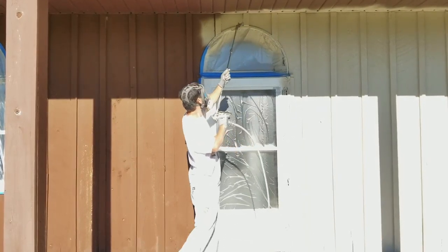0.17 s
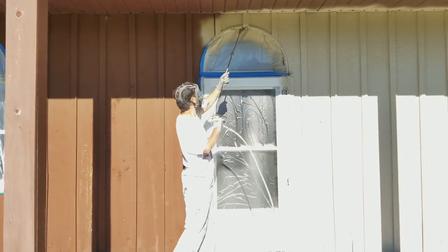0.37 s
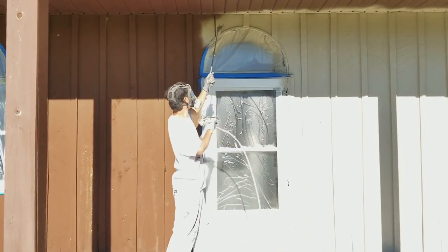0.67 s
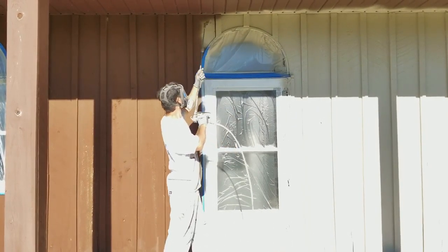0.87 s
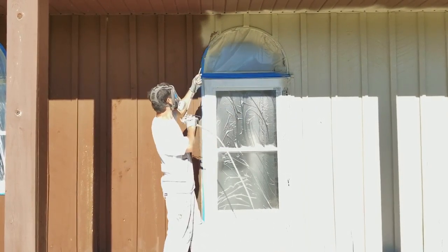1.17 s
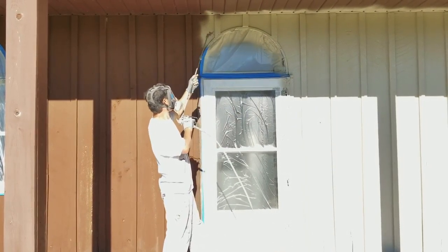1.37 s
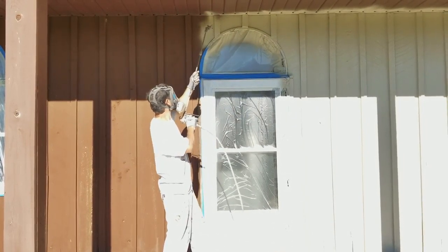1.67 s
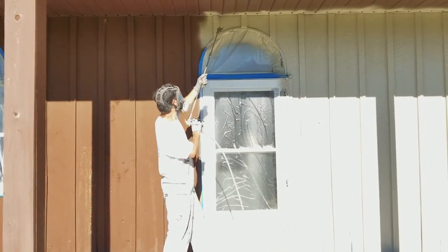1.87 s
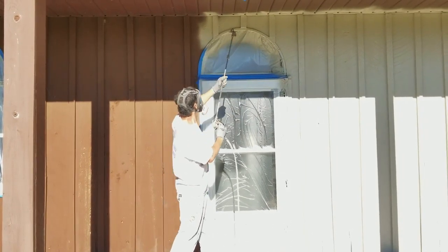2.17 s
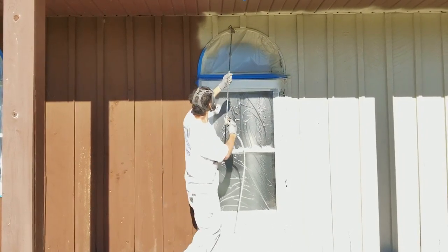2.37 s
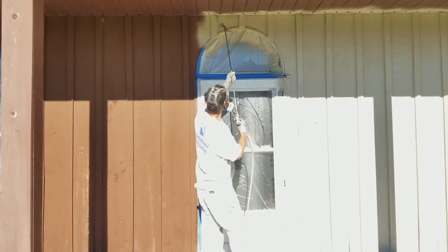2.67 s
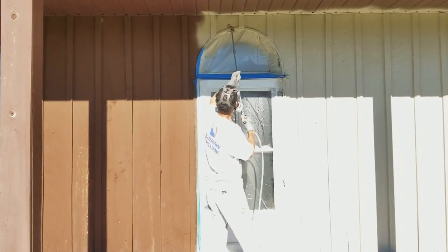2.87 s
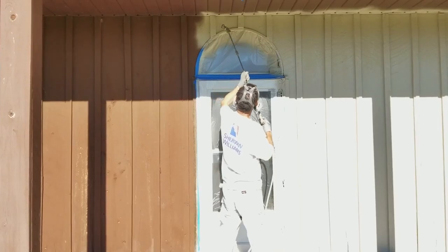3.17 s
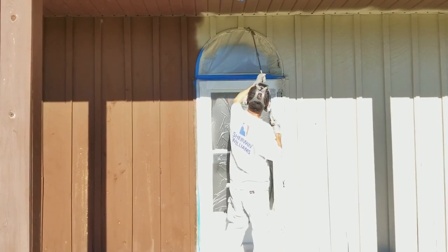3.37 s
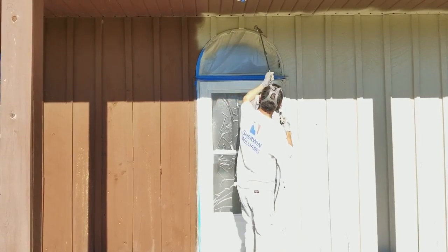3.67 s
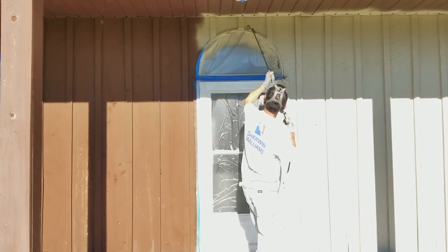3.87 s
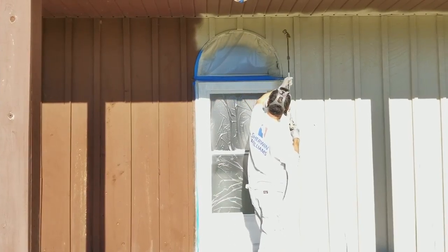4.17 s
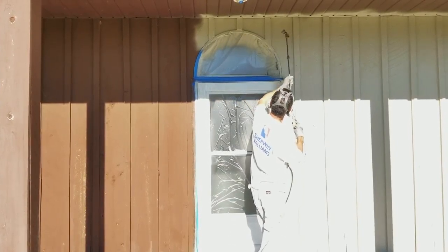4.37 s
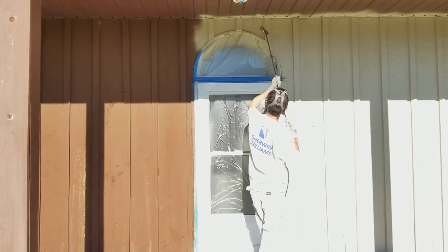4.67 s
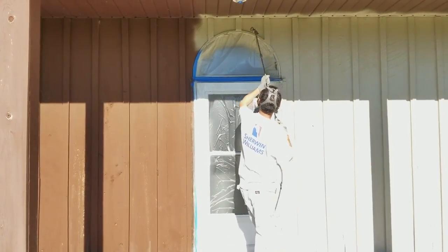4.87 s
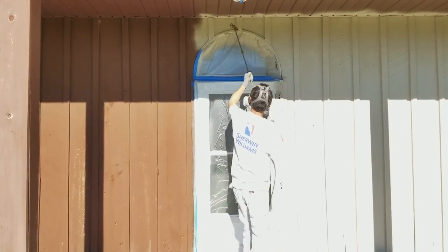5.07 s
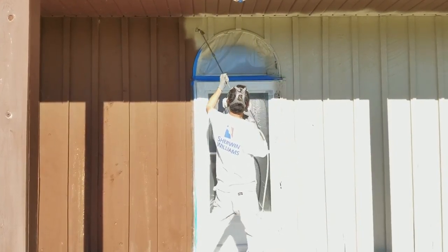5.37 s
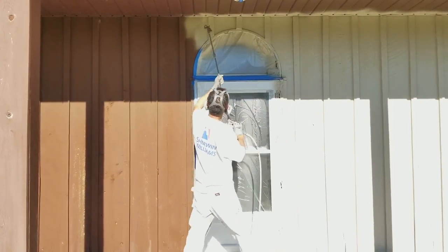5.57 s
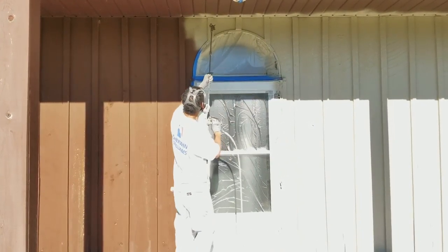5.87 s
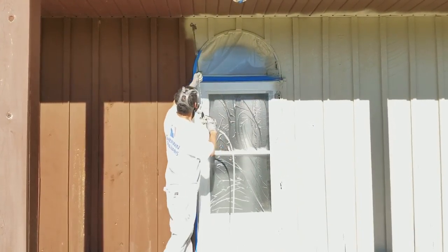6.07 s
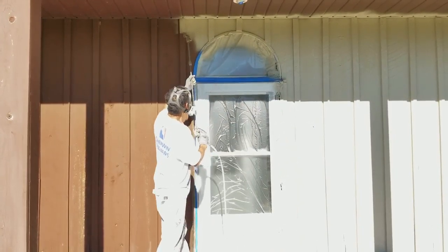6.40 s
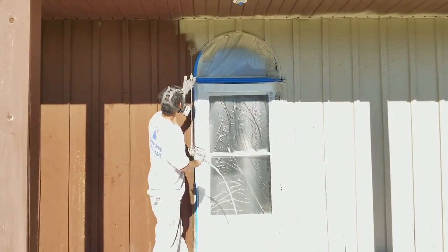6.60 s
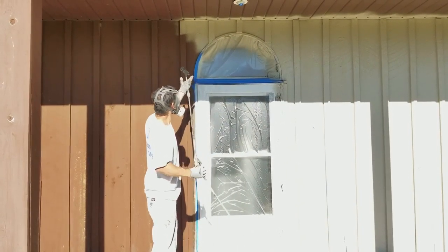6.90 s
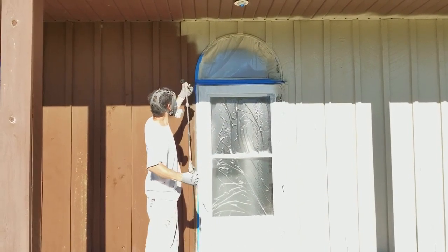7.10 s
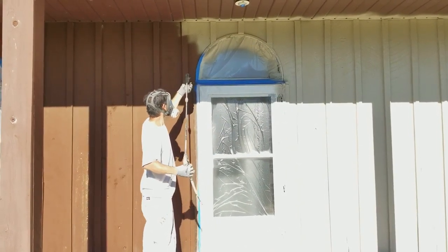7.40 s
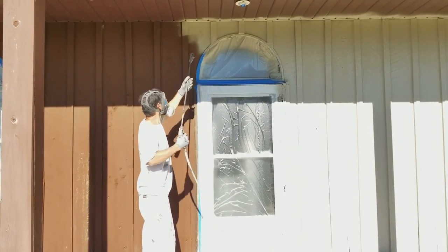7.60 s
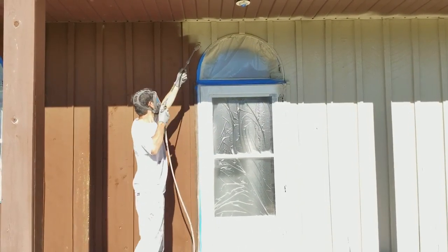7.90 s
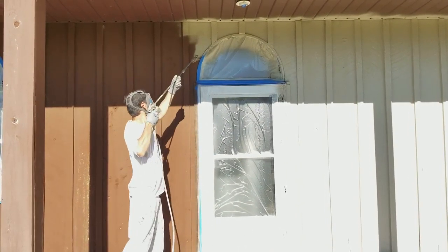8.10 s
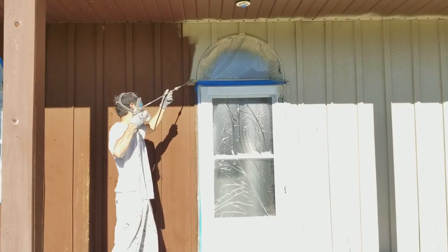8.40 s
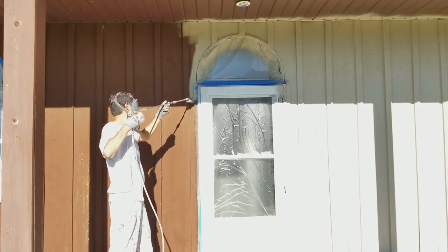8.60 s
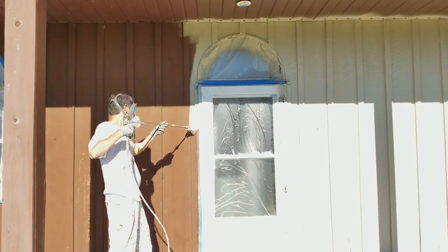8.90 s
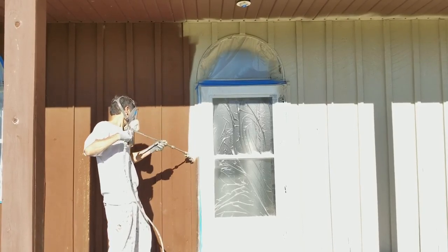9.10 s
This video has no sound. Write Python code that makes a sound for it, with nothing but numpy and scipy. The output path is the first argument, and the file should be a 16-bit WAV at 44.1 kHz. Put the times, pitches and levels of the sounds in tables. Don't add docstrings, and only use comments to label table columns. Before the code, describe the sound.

Stereo microphone near a painter under a timber overhang in a quiet yard. Crisp high-pressure hisses come and go, mostly a tenth of a second long, then two slightly longer sweeps. Soft rumble, light wind, clothing and hose rustles and faint chirps fill the gaps. A gritty electric pump whines for under a second on the left, a tap sounds, and continuous spray takes over to the end.

```python
import sys
import numpy as np
from scipy import signal
from scipy.fft import rfft, irfft, next_fast_len
from scipy.io import wavfile
from scipy.ndimage import uniform_filter1d

SR = 44100
rng = np.random.default_rng(int(sys.argv[2]) if len(sys.argv) > 2 else 0)


def store_wav(level_fs):
    pcm = np.round(np.clip(np.atleast_2d(level_fs), -1, 1) * 32767)
    wavfile.write(sys.argv[1], SR, pcm.T.astype(np.int16))


def gain_from_decibels(decibels):
    exponent = np.asarray(decibels, float) / 20
    return 10 ** exponent


N = 407925

# [time_s, level_db]
RUMBLE = [(0.0, -66), (0.05, -57), (0.98, -57), (1.03, -50), (1.29, -59), (1.75, -59), (1.83, -45.5),
          (1.93, -62), (1.98, -49.5), (2.16, -57), (2.26, -53.5), (3.06, -58.5), (4.53, -55.5),
          (4.97, -50.5), (5.49, -71.5), (5.98, -70.5), (6.7, -52.5), (7.2, -56), (7.8, -51.5), (8.2, -56.5),
          (9.25, -56)]
# [freq_hz, density_db]
RUMBLE_COLOUR = [(12, -45), (30, -20.5), (55, -9), (80, -1), (97, 3.5), (118, -3.5), (140, -6.5), (172, -7),
                 (200, -16), (300, -20), (430, -28), (520, -52)]
# [time_s, level_db]
GUSTS = [
    (0, -59),
    (1.7, -54),
    (2.6, -57),
    (3.2, -66),
    (4.1, -73.5),
    (4.7, -55),
    (5.4, -81),
    (6.6, -78.5),
    (9.25, -70),
]
# [freq_hz, density_db]
WIND_COLOUR = [(15, -2.5), (35, 4.0), (60, 2.0), (110, -7.5), (200, -42.5)]
# [peak_s, fade_s, level_db]
SWELLS = [(.2, 0.35, -63), (.8, 0.34, -69.5), (2.1, 0.19, -60.5), (2.35, 0.24, -69), (2.85, 0.35, -70),
          (3.24, 0.081, -65), (3.63, 0.15, -62), (4.1, 0.56, -71), (4.85, 0.066, -70), (5.48, 0.13, -63),
          (5.8, 0.14, -70), (7.48, 0.11, -64), (7.75, 0.25, -64)]
# [freq_hz, density_db]
HUM_COLOUR = [(130, -46.5), (230, -15), (437, -16.5), (530, -7), (640, -7.5), (710, 0), (780, -6.5),
              (860, -0.5), (950, -15), (1110, -17), (1400, -21.5), (1900, -59)]
# [pitch_hz, level_db]
HUM_TONES = [
    (527.6, -80),
    (710.6, -80),
    (855.9, -82),
]
# [freq_hz, density_db]
INSECT_COLOUR = [(600, -30), (1000, -11), (1250, -2.5), (1630, -22.5), (2300, -13.5), (3200, -23),
                 (3600, -6.5), (4100, -0.5), (4600, -20.5), (5500, -26.5), (7000, -48)]
# [peak_s, fade_s, rustle_db, scuff_db]
MOVES = [(0.02, 0.14, -65, -88), (0.2, 0.12, -62.5, -74), (.6, 0.2, -64.5, -76), (0.85, 0.17, -65, -78),
         (1.47, 0.057, -49.5, -72), (2.05, 0.094, -65, -67.5), (2.29, 0.066, -66, -76),
         (2.76, 0.065, -54, -81), (2.95, 0.2, -61.5, -72.5), (3.43, 0.14, -69.5, -86),
         (3.68, 0.086, -65, -81), (4.07, 0.081, -61, -70.5), (4.25, 0.32, -61, -81),
         (4.44, 0.089, -62, -78), (4.7, 0.27, -61.5, -94), (5.02, 0.16, -61, -78), (5.62, 0.16, -66, -74.5),
         (5.85, 0.063, -66, -78), (7.59, 0.092, -47.5, -54.5), (7.65, 0.046, -60, -54),
         (7.43, .04, -76, -71), (7.472, 0.04, -53.5, -53.5), (1.42, .04, -55, -75),
         (7.72, 0.061, -58, -65.5), (1.62, 0.14, -71, -76), (7.76, 0.092, -61.5, -82)]
# [peak_s, fade_s, rustle_db, scuff_db]
JERKS = [
    (1.387, 0.15, -55.5, -77),
    (7.522, 0.067, -51, -54),
]
# [freq_hz, density_db]
RUSTLE_COLOUR = [(2940, -21.5), (4400, -5.5), (5430, -15.5), (5890, -13.5), (6920, -11), (8000, -1.5),
                 (9430, -10), (13500, 0), (15100, -10.5), (15900, 3.5)]
SCUFF_COLOUR = [(700, -43), (1200, -9.5), (2100, -.5), (3500, -1), (5400, -6), (6200, -7), (7800, -20)]

# [open_s, shut_s, left_lag_samples, jet_db]
TRIGGER = [
    (0.219, 0.344, 1.63, -33),
    (1.049, 1.215, -1, -31.5),
    (1.707, 1.828, -1, -29.5),
    (2.465, 2.565, 0.5, -36),
    (2.991, 3.107, 0.5, -27.5),
    (3.738, 3.867, 0.85, -35.5),
    (4.451, 4.57, 2.5, -35.5),
    (5.047, 5.38, 0.5, -37),
    (5.872, 6.241, -1.4, -37),
    (8.004, 9.4, -1.8, -33),
]
NEEDLE_LIFT = [.005, .005, .005, .002, .005, .005, .003, .007, .013, .004]
# [freq_hz, density_db]
JET_COLOUR = [(150, -38.5), (260, -25.5), (420, -26.5), (600, -22), (1100, -13.5), (1400, -11.5),
              (2100, -15), (3200, -13.5), (4500, -6), (5600, -12), (6750, -4.5), (7500, 0.5), (8250, 4),
              (9100, 0), (10200, -0.5), (11800, 3), (13500, 3), (15700, -3.5)]
# [freq_hz, likeness]
JET_ALIKE = [(500, 1), (2400, 0.91), (5000, 0.69), (8000, 0.59), (12000, 0.63), (15000, 0.26)]
# [time_s, turned_db, near_db, gap_hz, ring_db]
WAND = [(0.28, 10, 6.5, 4600, -4), (1.13, 4, 1.2, 4800, 0), (1.76, 6, 0.3, 5050, 0),
        (2.51, 7, 4, 4420, 0.5), (3.05, 1.5, 1.5, 4670, 7.5), (3.8, 10, 3, 4750, 3),
        (4.51, 9.5, 4, 4500, -2.5), (5.1, 3, -0.5, 5040, 10.5), (5.35, 10, 0, 4730, 2.5),
        (5.9, 4, 0, 5300, 10), (6.05, -1, -4.5, 5720, 15.5), (6.13, 2.5, 0, 5100, 8),
        (6.19, 5, -.5, 4630, 7.5), (6.24, 3.5, -2, 4500, 9), (8.02, 9, 2.5, 4140, 3),
        (8.12, 9.5, 2, 4930, 0), (8.18, 9, 1.5, 4450, 4), (8.26, 8.5, 2.5, 5100, 1),
        (8.34, 8, 7.5, 4450, 1.5), (8.5, 7.5, 2.5, 4500, -2.5), (8.8, 0.5, -1, 4400, 0),
        (9.25, 3, -2, 4370, 0)]
# [time_s, left_right_db, core_db, tip_hz, tip_db]
AIM = [(0.28, -0.5, 0.5, 12500, 2.5), (1.13, -0.5, 0.5, 12500, 3.5), (1.76, -.6, -3, 12500, -3.5),
       (2.51, -1.3, 1, 12600, 6.5), (3.05, -0.7, -4.5, 12500, -1), (3.8, -1, 0, 12500, 1.5),
       (4.51, -1.5, 1.5, 12500, 1.5), (5.08, -1.5, 5, 12200, 10.5), (5.22, 0, 2.5, 11800, 5.5),
       (5.35, -2, -1.5, 12600, -16), (5.9, -0.5, 5.5, 10800, 7.5), (6.0, -0.5, 1.5, 11900, 6),
       (6.1, -1, -2, 11700, 8), (6.22, -0.5, -2, 12500, 6.5), (8.03, -1, 0.5, 12700, 2.5),
       (8.4, -0.8, -2, 12500, -2.5), (8.8, 0, -1.5, 12700, 2.5), (9.25, -0.3, 0.4, 12900, -7.5)]
# [time_s, pitch_hz, level_db]
CORE = [(0.25, 8000, 2.5), (1.1, 8200, 0.5), (5.06, 8000, 0.5), (5.2, 8200, 0), (5.31, 7700, 6),
        (5.37, 7980, -1.5), (8.0, 7600, 5.5), (8.12, 8000, 0), (8.25, 8250, 2), (8.55, 8250, 3.5),
        (8.85, 8300, 8), (9.0, 8500, 4.5), (9.13, 8500, 7), (9.25, 8000, 2)]
# [time_s, ring_hz]
FLOOR_BOUNCE = [
    (8.0, 1990),
    (8.35, 1150),
    (8.45, 1150),
    (8.6, 1780),
    (9.25, 1950),
]
# [centre_hz, width_hz, level_db]
BOARDS = [(983, 70, -10.5), (1270, 140, 0), (1666, 100, -7)]

# [start_s, length_s, from_hz, to_hz, level_db]
BIRDS = [
    (1.955, .032, 5120, 5380, -77),
    (1.985, .07, 5350, 4680, -76),
    (2.02, .016, 3950, 3520, -73),
    (2.032, .038, 3560, 3150, -69),
    (2.074, .04, 3560, 3190, -66),
    (2.11, .024, 3150, 2400, -68),
    (2.2, 0.058, 844, 834, -65),
    (3.615, 0.045, 910, 840, -64),
    (0.769, 0.063, 1890, 1876, -80),
]
# [start_s, length_s, from_hz, to_hz, level_db]
FAR_BIRDS = [
    (4.79, .08, 4050, 3800, -79),
    (1.62, .07, 4280, 4260, -73),
    (3.48, .08, 3750, 4050, -72),
    (3.55, .08, 2560, 2560, -77),
    (2.17, .1, 3750, 3700, -77),
]
# [start_s, peak_db, pitch_hz]
TAPS = [
    (1.457, -41, 5900),
    (3.211, -50, 1400),
    (7.396, -48, 1160),
    (7.02, -28, 2830),
    (7.52, -59.5, 4300),
]
# [start_s, peak_db]
SNAPS = [
    (1.3855, -39.5),
    (1.439, -37),
    (1.4445, -44),
    (1.456, -30.5),
    (1.472, -34),
    (1.489, -35),
    (1.6656, -54.5),
    (7.62, -47.5),
    (7.765, -50),
    (7.795, -54),
]

# [time_s, level_db]
MOTOR = [
    (6.33, -27),
    (6.355, -4.5),
    (6.45, -0.5),
    (6.7, -1.3),
    (6.98, -0.8),
    (7.03, -2.5),
    (7.125, -14),
    (7.17, -29),
    (7.32, -48.5),
]
# (start_s, from_hz, to_hz, settle_s, whine_db)
SPIN_UP = (6.345, 740, 1340, .055, -3)
RUN_DOWN = (6.982, 1180, 700, .042, 1)
# [start_s, loaded_whine_hz, effort_db, valve_knock_db]
STROKES = [
    (6.428, 1207, -1.5, -44),
    (6.543, 1204, 0, -27),
    (6.635, 1200, .5, -40),
    (6.742, 1192, .5, -23),
    (6.836, 1165, 1, -34),
    (6.948, 1165, 0, -32),
]
# [pitch_multiple, level_db]
GEARS = [
    (3, -9),
    (4, -10.5),
    (5, -16),
    (5.5, -24),
]
# [peak_s, fade_s, level_db]
LOW_SURGES = [(6.44, 0.018, -36.5), (6.475, 0.018, -32), (6.497, 0.023, -25), (6.52, 0.021, -33),
              (6.575, .03, -42), (6.61, 0.012, -32), (6.645, 0.018, -33), (6.67, .01, -30),
              (6.692, 0.011, -26), (6.74, 0.014, -36), (6.785, 0.016, -34.5), (6.82, .025, -36.5),
              (6.85, .015, -32.5), (6.885, 0.019, -26.5), (6.915, .025, -33), (6.96, 0.024, -40),
              (7.0, 0.028, -39.5)]
HIGH_SURGES = [(6.39, 0.016, -40), (6.415, .008, -40.5), (6.44, .012, -44), (6.462, .01, -34.5),
               (6.478, 0.0091, -29.5), (6.497, 0.0086, -31), (6.52, .015, -45), (6.554, 0.0065, -25.5),
               (6.58, .008, -30), (6.595, .01, -36.5), (6.64, .012, -31.5), (6.665, .012, -35),
               (6.687, 0.0086, -27), (6.705, .01, -36), (6.72, .01, -36), (6.753, 0.0096, -26),
               (6.79, 0.012, -29), (6.808, .01, -36), (6.84, .006, -34), (6.874, 0.013, -28.5),
               (6.89, .007, -35), (6.905, 0.011, -27), (6.93, 0.013, -37.5), (6.955, 0.0085, -27),
               (6.981, 0.012, -28.5), (7.02, 0.011, -36.5), (7.045, 0.014, -37)]
# [centre_hz, width_hz, level_db]
CASING = [(1195, 70, 6.5), (2380, 90, 8), (2770, 70, 8), (3720, 160, 3.5), (5150, 220, 5), (6150, 200, 2)]
# [peak_s, fade_s, level_db]
LID = [
    (6.39, .04, -44),
    (6.58, .02, -52),
    (7.01, .04, -47),
]
# [peak_s, fade_s, level_db]
PANEL = [
    (7.095, 0.025, -41),
    (7.125, .018, -50),
]
# [freq_hz, density_db]
HOUSING_COLOUR = [(120, -49), (200, -13.5), (280, -22.5), (431, -17.5), (626, -14.5), (860, -22),
                  (930, -22), (975, -13), (1030, -43), (1200, -2.5), (1500, -33)]
BRUSH_COLOUR = [(800, -30.5), (1050, -6), (1600, -1.5), (2000, -6.5), (2400, 2), (2780, 0), (3100, -2.5),
                (4400, -7.5), (5100, -6.5), (5550, -8), (6100, -12.5), (6450, -13), (6720, -6), (6900, -10),
                (7000, -19), (10500, -14), (15900, -26.5)]

# [freq_hz, t60_s]
OVERHANG = [(500, 0.53), (4000, 0.21), (15000, 0.15)]
# [freq_hz, left_right_db]
PORTS = [(25, 1), (70, -2), (150, 3), (400, -1), (1300, 0.8), (2400, -2.5), (4400, -3), (8000, 1.7),
         (11000, -1.5), (15000, 12.5)]


def unit(x):
    return x / np.sqrt(np.mean(x ** 2) + 1e-20)


def along(points, hz):
    f, v = np.transpose(points)
    return np.interp(np.log(hz + 1), np.log(f + 1), v)


def curves(rows, t):
    s, *cols = np.transpose(rows)
    return [np.interp(t, s, c) for c in cols]


def bell(hz, centre, width, order=2):
    return 1 / (1 + ((hz - centre) / width) ** order)


def humps(rows, hz):
    return sum(db * bell(hz, centre, width) for centre, width, db in rows)


def bumps(rows, now, rise=0.58):
    total = 0
    for s, fade, *dbs in rows:
        u = (now - s) / np.where(now < s, rise * fade, fade)
        total = total + np.outer(gain_from_decibels(2 * np.array(dbs)), np.exp(-2 * u ** 2))
    return np.sqrt(total)


def wobble(rate, size=N):
    place = np.arange(size) * rate / SR
    knots = rng.standard_normal(int(size * rate / SR) + 4)
    k = place.astype(int)
    blend = .5 - .5 * np.cos(np.pi * (place - k))
    return knots[k] + (knots[k + 1] - knots[k]) * blend


def mottle(shape, bins, frames):
    field = uniform_filter1d(rng.standard_normal(shape), size=bins, axis=0)
    return unit(uniform_filter1d(field, size=frames, axis=1))


def filtered(x, response):
    m = next_fast_len(x.shape[-1] + 4096)
    return irfft(rfft(x, m) * response(np.fft.rfftfreq(m, 1 / SR)), m)[..., :x.shape[-1]]


def lagged(mono, lag):
    side = np.array([[1], [-1]])
    return filtered(np.tile(mono, (2, 1)), lambda hz: np.exp(-1j * np.pi * hz * lag / SR * side))


def at_ports(a, b, alike, late):
    turn = np.arccos(np.clip(alike, -1, 1)) / 2
    left = (np.cos(turn) * a + np.sin(turn) * b) * late
    right = (np.cos(turn) * a - np.sin(turn) * b) / late
    return np.array([left, right])


def rush(colour, alike, lag, patchy_db, size=N, order=10):
    hz, t, (a, b) = signal.stft(rng.standard_normal((2, size)), SR, nperseg=2 ** order)
    gain = gain_from_decibels(along(colour, hz)[:, None] + patchy_db * mottle(a.shape, 10, 5))
    late = np.exp(-1j * np.pi * hz * lag / SR)[:, None]
    pair = gain * at_ports(a, b, alike, late)
    return unit(signal.istft(pair, nperseg=2 ** order)[1][:, :size])


def rumble():
    level_db, = curves(RUMBLE, np.arange(N) / SR)
    level = gain_from_decibels(level_db + 1.47 + 0.54 * wobble(6.4))
    return level * rush(RUMBLE_COLOUR, 0.97, -5.0, patchy_db=-0.5, order=13)


def wind():
    level_db, = curves(GUSTS, np.arange(N) / SR)
    level = gain_from_decibels(level_db + 4.4 * wobble(2.1)) * gain_from_decibels([[4.5], [-3.5]])
    return level * rush(WIND_COLOUR, 0.045, 0.11, patchy_db=4.5, order=13)


def far_machine():
    now = np.arange(N) / SR
    coarse = now[::64]
    swell = np.interp(now, coarse, bumps(SWELLS, coarse)[0])
    hum = gain_from_decibels(4.5) * np.hypot(swell, gain_from_decibels(-72)) * rush(HUM_COLOUR, 0.85, 24, patchy_db=1.8, order=12)
    tones = sum(gain_from_decibels(db + 3 * wobble(3)) * np.sin(2 * np.pi * hz * now + 0.6 * wobble(15))
                for hz, db in HUM_TONES)
    return hum + np.array([np.roll(tones, 26), tones])


def insects():
    return gain_from_decibels(9.0 + 1.4 * wobble(1.4)) * gain_from_decibels(-83) * rush(INSECT_COLOUR, .3, 3.9, patchy_db=2)


def clothes_and_hose():
    now = np.arange(N) / SR
    coarse = now[::64]
    motion = np.hypot(bumps(MOVES, coarse), bumps(JERKS, coarse, rise=0.05))
    moving, scuffing = (np.interp(now, coarse, c) for c in motion)
    slips = gain_from_decibels(1.44 * wobble(100))
    scuff = gain_from_decibels(0.6) * np.hypot(scuffing * slips, gain_from_decibels(-81.5))
    rustle = gain_from_decibels(6.5) * np.hypot(moving * slips, gain_from_decibels(-71))
    return (scuff * rush(SCUFF_COLOUR, 0.35, -2.4, patchy_db=1.5)
            + rustle * rush(RUSTLE_COLOUR, 0.21, -1.3, patchy_db=1.5))


def spray_bands(hz, t, jet_db, shut_s, since):
    turned_db, near_db, _, _ = curves(WAND, t)
    mist_db = jet_db + turned_db - 17 * np.exp(np.clip(t - shut_s, None, 0) / 0.0077)
    spit_db = 2 * np.exp(-since / 0.013)
    build_db = 5.5 * np.exp(-since / 0.029)
    thud_db = -58 - 0.11 * turned_db
    hollow_db = -58 - 8.0 + 4 - 8.0 * ((t - 8.75) / 0.34) ** 2
    boom_db = -52 + near_db - 0.73 * turned_db - build_db
    splash_db = -38.5 + 0.64 * near_db + spit_db
    deep, low, mid, high = (bell(hz, 0, edge_hz, 10) for edge_hz in (1000, 2300, 6000, 10000))
    parts = [(deep, thud_db), (bell(hz, 0, 380, 6), hollow_db), (low - deep, boom_db),
             (mid - low, splash_db), (high - mid, jet_db - 0.22 * near_db), (1 - high, mist_db)]
    colour = gain_from_decibels(2 * along(JET_COLOUR, hz))
    power = 0
    for band, db in parts:
        share = colour * np.abs(band)
        power = power + np.outer(share / np.mean(share), gain_from_decibels(2 * db))
    return power ** .5


def spray_rings_db(hz, t):
    _, _, gap_hz, ring_db = curves(WAND, t)
    _, core_db, tip_hz, tip_db = curves(AIM, t)
    sing_hz, sing_db = curves(CORE, t)
    bounce_hz, = curves(FLOOR_BOUNCE, t)
    return (tip_db * bell(hz, tip_hz, 900) + core_db * bell(hz, 8400, 1800, 4)
            + ring_db * bell(hz, gap_hz, 280) + sing_db * bell(hz, sing_hz, 350)
            + 3.5 * (t > FLOOR_BOUNCE[0][0]) * bell(hz, bounce_hz, 300) + humps(BOARDS, hz))


def needle_lift(now):
    lift = 0
    for (on, off, _, _), lift_s in zip(TRIGGER, NEEDLE_LIFT):
        opening = 1 - np.exp(-np.clip(now - on, 0, None) / lift_s)
        lift = lift + opening * np.exp(-np.clip(now - off + 0.0046, 0, None) / 0.0047)
    return lift


def spray():
    sputter = gain_from_decibels(0.45 * wobble(900) + 0.46 * wobble(250) + 0.24 * wobble(25))
    hz, t, (a, b) = signal.stft(sputter * rng.standard_normal((2, N)), SR, nperseg=512)
    column = hz[:, None]
    opens, shuts, lags, jets_db = np.transpose(TRIGGER)
    pull = np.clip(np.searchsorted(opens, t + .1) - 1, 0, None)
    since = np.clip(t - opens[pull], 0, None)
    gain = spray_bands(hz, t, jets_db[pull], shuts[pull], since) * gain_from_decibels(spray_rings_db(column, t))
    gain *= gain_from_decibels(1.2 * mottle(gain.shape, 6, 20))
    gain *= gain_from_decibels(2.2 * mottle(gain.shape, 3, 4) * bell(column, 0, 4500, 4))
    late = np.exp(-1j * np.pi * np.outer(hz, lags[pull]) / SR)
    pair = gain * at_ports(a, b, along(JET_ALIKE, hz)[:, None], late)
    pan_db = curves(AIM, t)[0]
    pair *= gain_from_decibels(np.array([pan_db, -pan_db]) / 2)[:, None]
    hiss = signal.istft(pair, SR, nperseg=512)[1][:, :N]
    near = gain_from_decibels(1.5) * hiss * needle_lift(np.arange(N) / SR)
    echo = np.pad(uniform_filter1d(near[::-1], size=3), ((0, 0), (round(.147 * SR), 0)))[:, :N]
    return near + gain_from_decibels(-34.5) * echo


def birds():
    out = np.zeros(N + SR)
    notes = [(b, .1) for b in BIRDS] + [(b, 2) for b in FAR_BIRDS]
    for (s, length, from_hz, to_hz, db), blur in notes:
        n = int(length * SR)
        u = np.arange(n) / n
        phase = 2 * np.pi * np.cumsum(from_hz + (to_hz - from_hz) * u) / SR
        level = gain_from_decibels(db + 5.0 + 1.5 * wobble(90, size=n)) * np.sin(np.pi * u) ** 0.55
        out[round(s * SR):][:n] += level * np.sin(blur * wobble(260, size=n) + phase)
    return np.array([out[:N], out[:N]])


def taps_and_snaps():
    out = np.zeros(N + SR)
    t = np.arange(2000) / SR
    for s, db, hz in TAPS:
        ring = np.sin(2 * np.pi * hz * t) + 0.07 * rng.standard_normal(len(t))
        out[round(s * SR):][:len(t)] += gain_from_decibels(db + 5.5 - 60 * t / 0.0042) * ring
    for s, db in SNAPS:
        noise = np.diff(rng.standard_normal(len(t) + 1))
        out[round(s * SR) - 20:][:len(t)] += gain_from_decibels(db - 12 - 60 * t / 0.013) * noise
    return np.array([out[:N], out[:N]])


def gear_whine(now, power_db):
    n = len(now)
    free_hz = (1350, 1392)
    first_knock_db = STROKES[0][3]
    work = [(s, free_hz[i % 2], hz, .025, db, knock) for i, (s, hz, db, knock) in enumerate(STROKES)]
    phases = [(*SPIN_UP, first_knock_db), *work, (*RUN_DOWN, first_knock_db)]
    start, from_hz, to_hz, settle, effort_db, knock_db = np.transpose(phases)
    k = np.clip(np.searchsorted(start, now) - 1, 0, None)
    since = np.clip(now - start[k], 0, None)
    starting, coasting = k == 0, k == len(start) - 1

    idle = np.exp(-(since / settle[k]) ** 1.41)
    pitch = to_hz[k] + (from_hz[k] - to_hz[k]) * idle
    blur = .006 + .012 * (starting | coasting)
    phase = 2 * np.pi * np.cumsum(pitch * (1 + blur * wobble(160, size=n))) / SR
    shake = .45
    first = bumps(LOW_SURGES, now, rise=0.87)[0] * np.sin(phase + .5 * wobble(120, size=n))
    second = bumps(HIGH_SURGES, now, rise=1)[0] * np.sin(2 * phase + shake * wobble(150, size=n))
    upper = 0
    for m, db in GEARS:
        level = gain_from_decibels(db + humps(CASING, m * pitch) + 3.5 * wobble(89.6, size=n))
        upper = upper + level * np.sin(m * phase + 0.65 * shake * m * wobble(250, size=n))
    slack_db = 9 * np.clip(since / .11, 0, 1.2) ** 3
    upper_db = effort_db[k] - 3 - 1.1 * slack_db - 9 * idle * starting - 6 * coasting
    upper *= gain_from_decibels(uniform_filter1d(upper_db, size=400)) * gain_from_decibels(power_db - 39 + 7.5)

    knock_noise = filtered(rng.standard_normal((2, n)), lambda hz: hz / (hz + 900) / (1 + (hz / 7000) ** 2))
    knocks = gain_from_decibels(knock_db[k] - 60 * since / 0.052) * knock_noise
    lid = bumps(LID, now)[0] * gain_from_decibels(-1 + 3 * wobble(60, size=n))
    lid *= np.sin(2 * np.pi * 975 * now + 1.3 * wobble(60, size=n))
    panel = bumps(PANEL, now)[0] * gain_from_decibels(4 * wobble(90.6, size=n))
    panel *= np.sin(2 * np.pi * 1254 * now + 3.0 * wobble(200, size=n))
    return lagged(upper + second + lid, -20) + knocks + lagged(first + panel, -25.5)


def pump():
    begin, n = round(6.3 * SR), round(1.1 * SR)
    now = (begin + np.arange(n)) / SR
    power_db, = curves(MOTOR, now)
    whine = gear_whine(now, power_db)
    shaking = 1 - np.exp(-np.clip(now - SPIN_UP[0], 0, None) / 0.091)
    housing = shaking * gain_from_decibels(0.58 * power_db - 56 + 10.0)
    housing = housing * rush(HOUSING_COLOUR, 0.95, -21.5, patchy_db=5.0, size=n, order=11)
    brushes = gain_from_decibels(0.8 * power_db - 43 + 4.5 + 1.8 * wobble(60.4, size=n))
    brushes = brushes * rush(BRUSH_COLOUR, 0.2, -18.5, patchy_db=1.2, size=n)
    fizz = filtered(brushes, lambda hz: hz > 7000)
    brushes = brushes + fizz * (gain_from_decibels(0.98 * np.minimum(power_db, 0)) - 1)
    running = np.clip((now - 6.345) / 0.0069, 0, 1) * np.clip((7.38 - now) / 0.13, 0, 1)
    return np.pad((whine + housing + brushes) * running, ((0, 0), (begin, N - begin - n)))


def under_overhang(x):
    hz, t, z = signal.stft(rng.standard_normal((2, SR // 3)), SR, nperseg=256)
    tail = signal.istft(z * gain_from_decibels(-60 * t / along(OVERHANG, hz)[:, None]), SR, nperseg=256)[1]
    return signal.oaconvolve(x, tail / np.linalg.norm(tail[0]), axes=1)[:, :N]


def scene():
    yard = rumble() + wind() + far_machine() + insects() + clothes_and_hose()
    gun = spray()
    small = birds() + taps_and_snaps()
    motor = pump()
    answer = under_overhang(gain_from_decibels(-9.0) * gun + gain_from_decibels(-9.0) * motor + gain_from_decibels(-6.0) * small)
    return yard + gun + small + motor + answer


def roll_off(x):
    return signal.sosfilt(signal.butter(12, 17010, fs=SR, output="sos"), x)


def record(dry):
    def port_response(hz):
        colour_db = np.outer([.5, -.5], along(PORTS, hz))
        return gain_from_decibels(colour_db - np.clip(hz - 15720, 0, None) / 3)
    return roll_off(filtered(dry, port_response))


dry = scene()
out = record(dry)
store_wav(out)
```